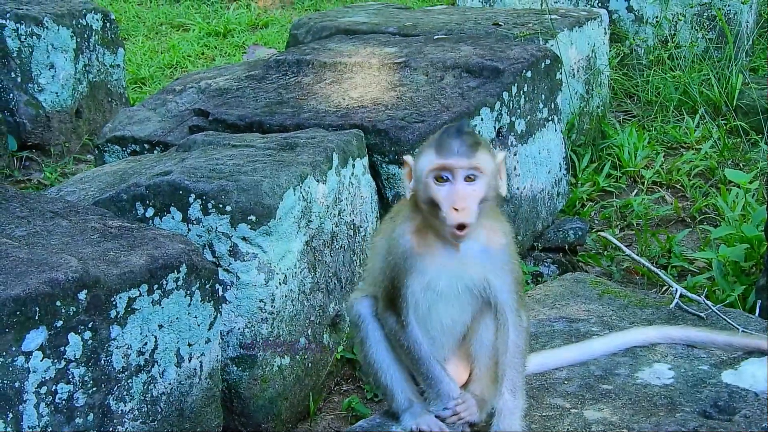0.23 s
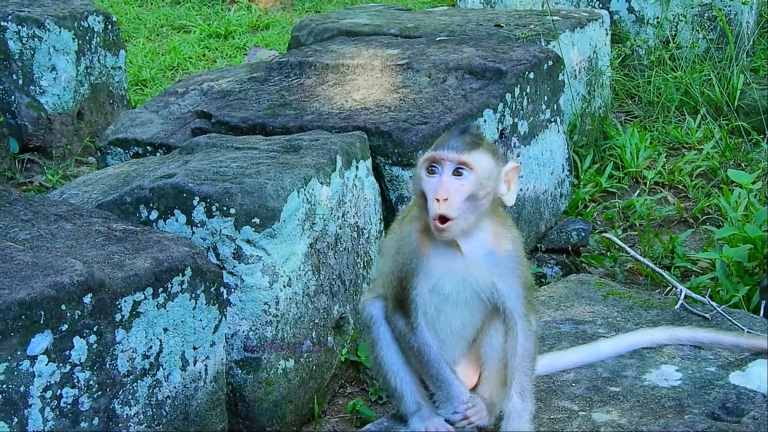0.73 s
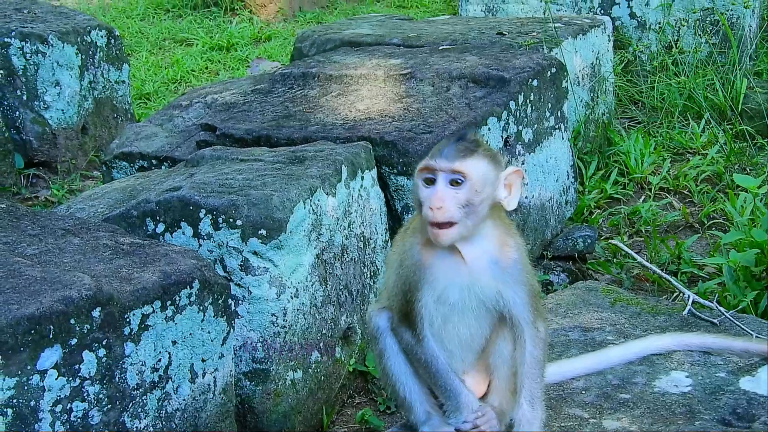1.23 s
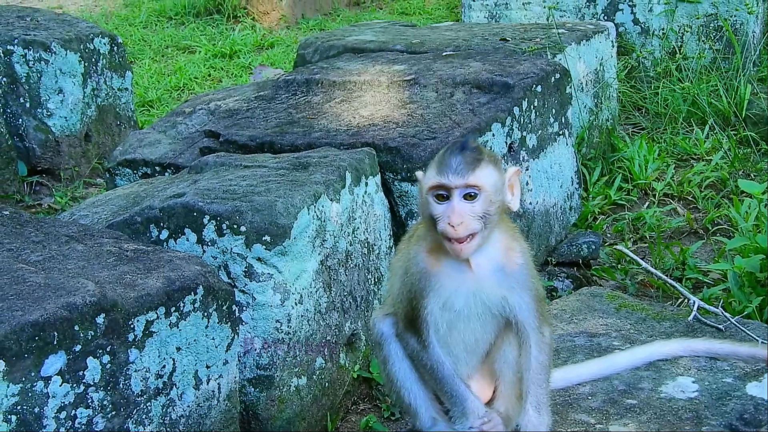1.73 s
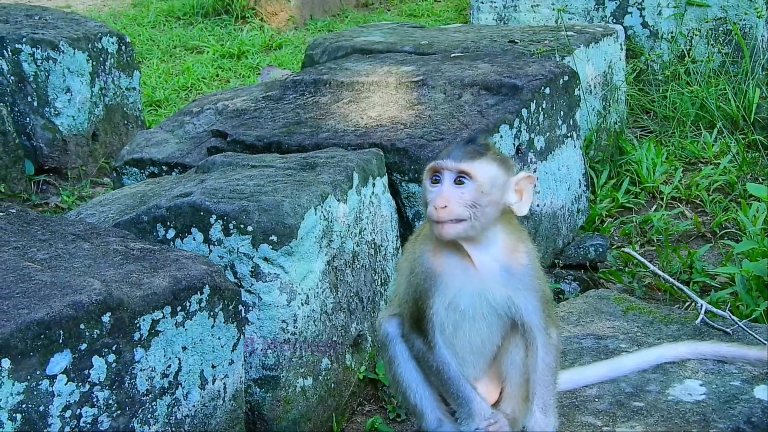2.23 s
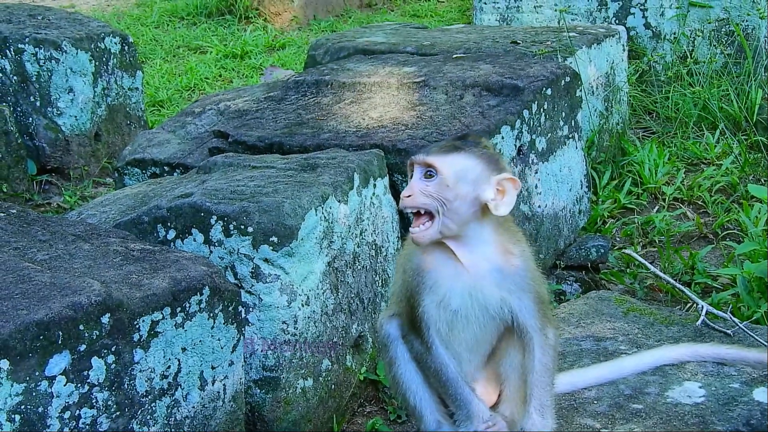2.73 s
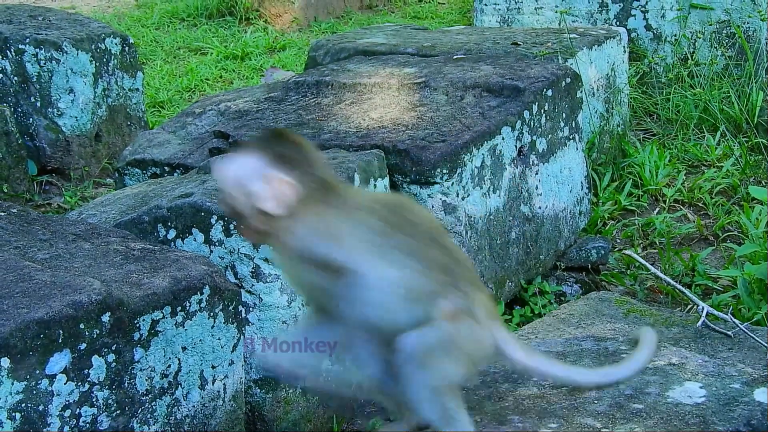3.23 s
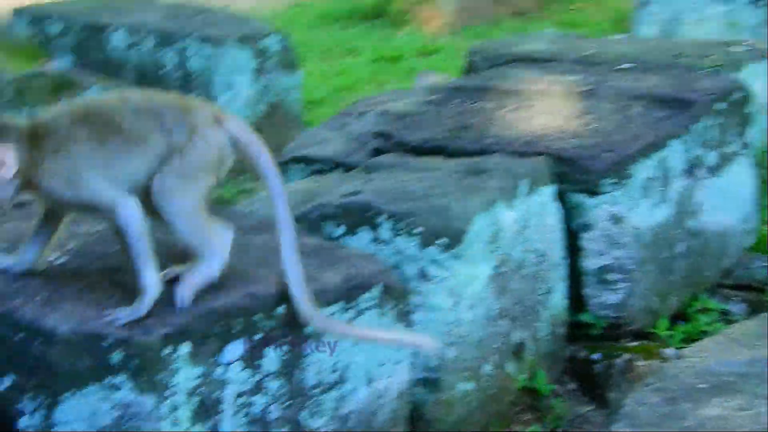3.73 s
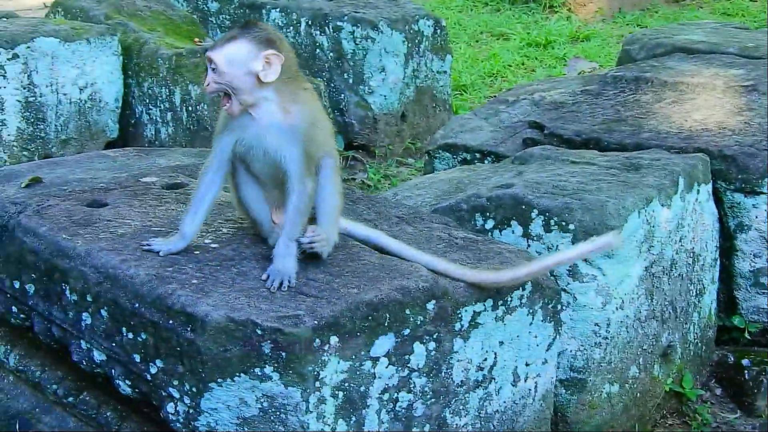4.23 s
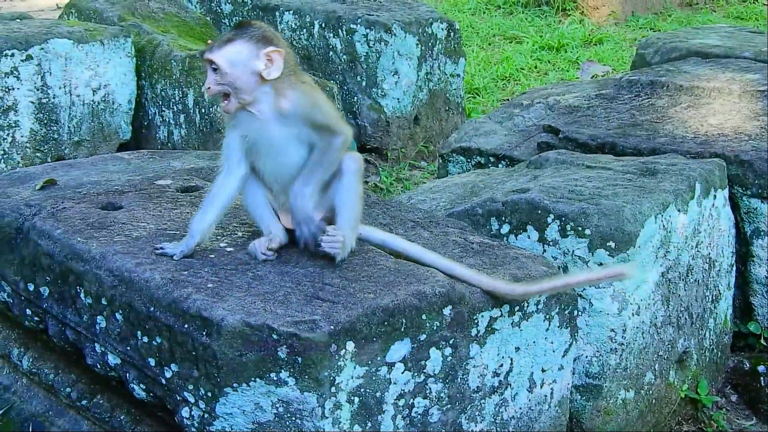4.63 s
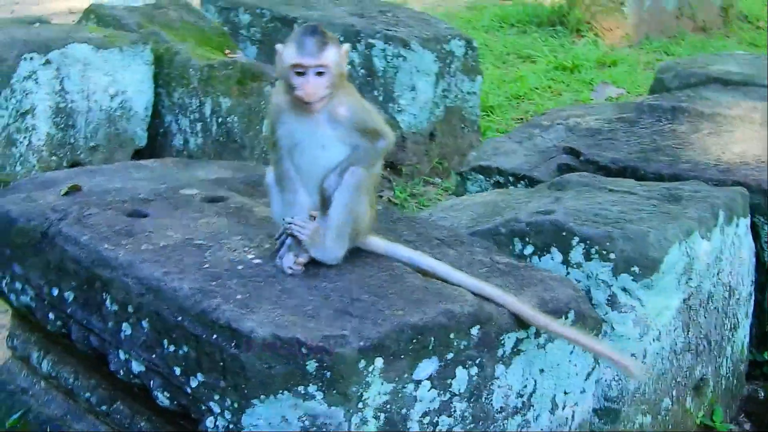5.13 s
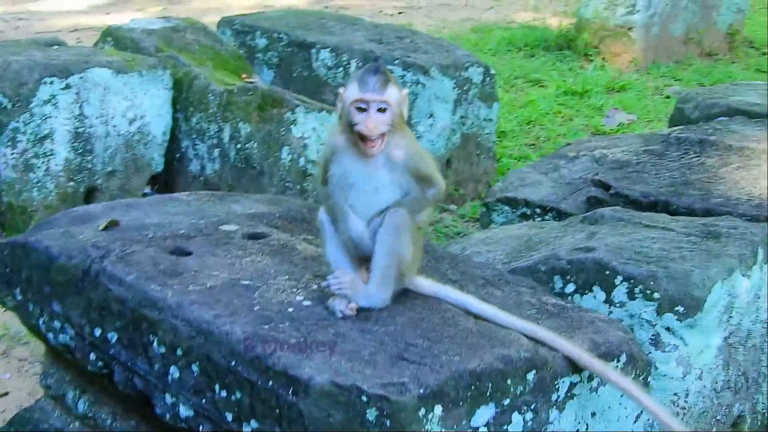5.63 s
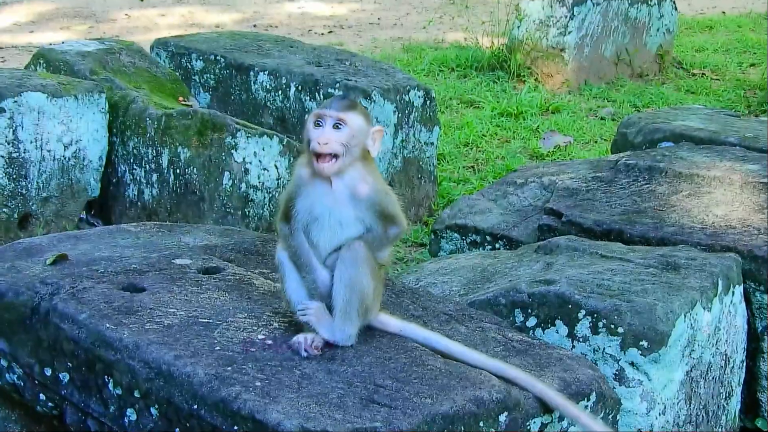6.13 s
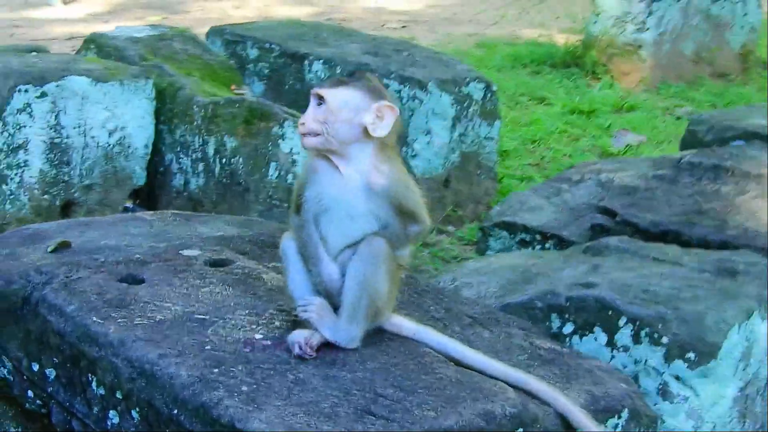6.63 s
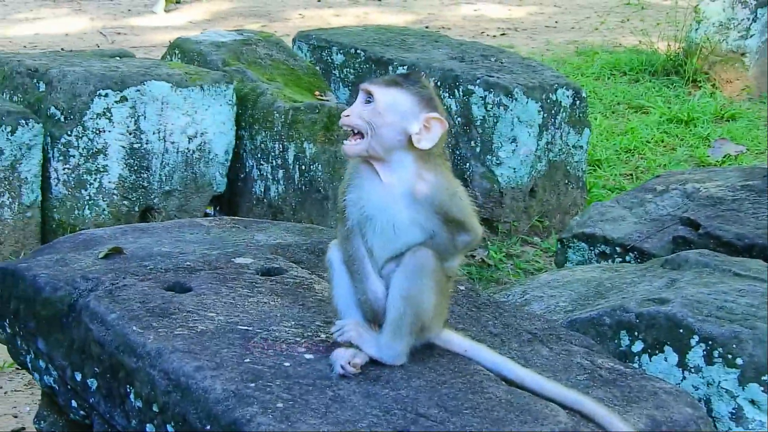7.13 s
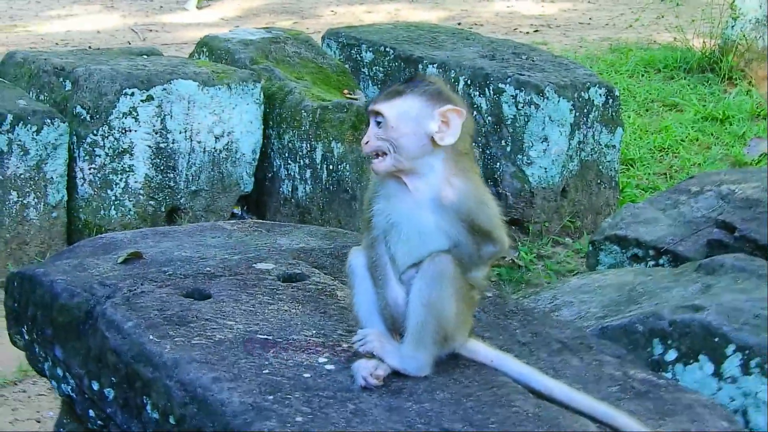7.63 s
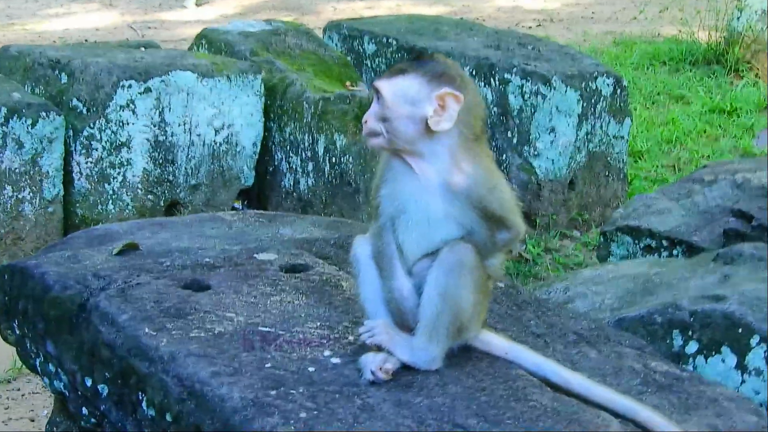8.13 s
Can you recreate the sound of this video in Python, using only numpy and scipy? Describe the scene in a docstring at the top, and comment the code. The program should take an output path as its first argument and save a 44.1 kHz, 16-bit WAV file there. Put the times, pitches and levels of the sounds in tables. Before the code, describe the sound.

Soft clear cooing from a small monkey stops early, followed by little peeps and a gap. Then come piercing squeals, whistling and torn with rasp: one long, one half as long, a brief one after a pause, and a fluttering cleaner one near the end. Behind runs a thin insect buzz, breathy foliage noise with occasional puffs, and low engine rumble. The voice is fairly near and central, with a quick stony scatter.

```python
"""Young monkey squealing on stone blocks

A young monkey outdoors ends a soft coo of clean partials, then squeals four times, with short whimpers between.
A squeal is a high whistle of the vocal folds, a second slower vibration that mixes with it,
and a rasp of torn tones and throat hiss when both turn irregular. Stone blocks and trees scatter the voice.
Around it insects sing as narrow bands, filtered noise hisses and rustles as leaves, and a far engine hums."""
import sys
import numpy as np
from scipy import signal
from scipy.io import wavfile
from scipy.ndimage import uniform_filter1d

SR = 44100
rng = np.random.default_rng(int(sys.argv[2]) if len(sys.argv) > 2 else 0)


def inscribe(sig):
    """Save sig as 16-bit PCM at rate SR to the path in sys.argv[1].

    A 1-D sig is mono; a 2-D sig holds one channel per row.
    Samples are clipped to [-1, 1] before scaling.
    """
    pcm = np.round(np.clip(np.atleast_2d(sig).T, -1, 1) * 32767)
    wavfile.write(sys.argv[1], SR, pcm.astype(np.int16))


N = 369538   # length in samples


def amp(db):
    """Turn dB into a linear gain."""
    return 10 ** (np.asarray(db) / 20)


def rms_one(x):
    """Scale a signal to an RMS of 1."""
    return x / np.sqrt(np.mean(x ** 2) + 1e-20)


def in_time(rows):
    """Draw straight lines through a table whose first column is seconds; one curve per further column."""
    s, *columns = np.transpose(rows)
    return [np.interp(np.arange(N) / SR, s, c) for c in columns]


def at_hz(points, hz):
    """Read a spectrum table at a frequency, on a logarithmic frequency axis."""
    table_hz, values = np.array(points).T
    return np.interp(np.log(hz), np.log(table_hz), values)


def smooth(x, seconds):
    """Round off a curve with a moving average."""
    return uniform_filter1d(x, max(int(seconds * SR), 1))


def drift(rate):
    """Slow chance: noise through a double one-pole low-pass at this rate in Hz; spread 1."""
    r = np.exp(-2 * np.pi * rate / SR)
    settled = signal.lfilter([1], [1, -2 * r, r * r], rng.standard_normal(N + SR))[SR:]
    return rms_one(settled)


def turns(hz):
    """Phase in radians of a tone with this pitch curve."""
    return 2 * np.pi * np.cumsum(hz) / SR


def resonate(x, hz, width_hz):
    """Ring a two-pole resonance."""
    r = np.exp(-np.pi * width_hz / SR)
    return signal.lfilter([1 - r, 0, r - 1], [1, -2 * r * np.cos(2 * np.pi * hz / SR), r * r], x)


def noise_band(x, hz, width_hz):
    """Pass noise through the same resonance twice, at an RMS of 1."""
    return rms_one(resonate(resonate(x, hz, width_hz), hz, width_hz))


def gate(start, end, fade):
    """Open from start to end with straight fades, all in seconds."""
    t = np.arange(N) / SR
    return np.clip(np.minimum(t - start, end - t) / fade, 0, 1)


def pan(x, db):
    """Place a mono sound by its left-over-right level in dB."""
    return np.array([x * amp(db / 2), x * amp(-db / 2)])


# The whistle of the vocal folds, one list per squeal.
# Each row: time in seconds, pitch in Hz, level in dB.
SQUEAL_WHISTLES = [
    [(2.563, 2815, -28), (2.585, 2960, -53.5), (2.62, 4350, -22.5), (2.65, 5010, -27), (2.68, 6250, -18),
     (2.72, 6790, -23), (2.76, 6060, -31), (2.83, 5600, -25), (2.865, 6520, -16.5), (2.9, 7000, -31),
     (2.995, 5446, -31), (3.02, 6950, -24.5), (3.045, 7400, -30), (3.1, 5780, -40), (3.15, 5256, -38),
     (3.25, 6890, -34.5), (3.3, 6790, -44), (3.45, 6280, -42), (3.55, 6980, -34.5), (3.61, 7030, -35),
     (3.675, 6970, -33), (3.7, 5947, -39), (3.722, 4095, -40)],
    [(3.959, 5420, -55.5), (3.975, 5530, -33.5), (3.99, 5730, -27.5), (4.02, 7420, -21.5),
     (4.07, 7870, -24), (4.11, 6990, -35), (4.15, 6980, -32.5), (4.18, 6335, -27), (4.2, 6780, -29.5),
     (4.22, 6030, -27), (4.255, 6750, -26), (4.32, 7190, -26), (4.37, 6980, -33), (4.41, 5910, -33),
     (4.451, 5650, -47.5)],
    [(5.548, 3686, -63), (5.58, 5120, -31.5), (5.6, 6300, -24.5), (5.63, 6830, -25), (5.67, 6280, -37),
     (5.71, 6580, -32), (5.745, 6365, -20.5), (5.78, 6296, -16.5), (5.828, 7140, -28), (5.848, 7300, -14.5),
     (5.877, 7165, -19.5), (5.89, 6690, -33), (5.91, 6200, -25.5), (5.93, 5810, -22), (5.95, 5795, -22.5),
     (5.968, 4340, -34.5)],
    [(6.994, 5330, -27.5), (7.018, 5257, -24.5), (7.035, 5690, -19.5), (7.052, 6380, -19),
     (7.085, 6530, -19), (7.12, 6035, -17.5), (7.152, 5885, -16.5), (7.176, 6114, -14.5),
     (7.2, 5640, -16.5), (7.22, 5150, -28), (7.242, 5060, -26.5), (7.264, 5770, -13.5),
     (7.287, 6290, -16.5), (7.322, 6510, -14.5), (7.347, 6370, -24.5), (7.362, 5850, -20.5),
     (7.4, 5300, -26.5), (7.43, 4790, -26.5), (7.452, 3640, -32)],
]
# Left-over-right level as the head turns. One value per squeal, in dB.
SQUEAL_SIDE_DB = [-0.32, 0.75, -0.82, 1.9]
PITCH_ROUNDING_S = 0.015


def squeals():
    """Two vibrations and their mixing tones; the louder the rasp against the whistle, the more both tear."""
    hz, db = in_time(np.concatenate(SQUEAL_WHISTLES))
    hz = smooth(hz, PITCH_ROUNDING_S)
    state = rasp_state()
    rasp_db = state[0]
    rough = np.clip((rasp_db - db + 14.0) / 15, 0, 1)
    drowned = np.clip((rasp_db - db + 8.5) / 14, 0, 1)     # the whistle gives way later than the mixing tones

    sum_db, second_hz, low_db, low_hz = state[1:]
    high = turns(hz * (1 + (.001 + .022 * drowned ** 2) * drift(200)))
    second = turns(second_hz * (1 + .05 * rough * drift(152.6)))
    steps = np.tanh(3 * drift(12))     # holds a pitch, then steps
    low = turns(low_hz * (1 + (0.00365 + 0.03 * rough) * drift(222) + .04 * rough * steps))

    tones = amp(db + 5 * drowned * drift(110) + 1.5 * drift(35)) * np.sin(high)
    tones += steady_mixing_tones(hz, db, rough, high)
    tones += overtones(hz, rough, high)
    low_flicker_db = rough * (3.5 * drift(120) + 4 * drift(15))     # breaks off and returns
    tones += amp(low_db + low_flicker_db) * np.sin(low)
    tones += amp(sum_db + 3.5 * rough * drift(60)) * np.sin(high + second)

    rasp = .8 * rms_one(torn_tones(high, second, low)) + .6 * rms_one(throat_hiss())
    voice = np.sqrt(2) * tones + amp(rasp_db) * rasp
    return sum(pan(voice * gate(rows[0][0], rows[-1][0], 0.0076), side_db)
               for rows, side_db in zip(SQUEAL_WHISTLES, SQUEAL_SIDE_DB))


# Bouts of rasp.
# Each row: start and end in seconds, rasp level first and last in dB, sum tone over rasp in dB,
# second vibration in Hz, low band level in dB, low band pitch first and last in Hz.
RASP_BOUTS = [(2.6, 2.634, -34, -32, -5, 3820, -70, 3500, 3500),
              (2.658, 2.718, -48, -39, 8, 3840, -50, 3170, 3050),
              (2.72, 2.832, -26, -22.5, -3, 2540, -47, 3300, 3500),
              (2.833, 2.867, -43.5, -38, -10, 2622, -48, 3300, 3200),
              (2.868, 2.963, -22.5, -28, -2, 2860, -46, 2970, 3700),
              (2.965, 3.017, -19, -19.5, -11, 3000, -30, 3775, 3780),
              (3.015, 3.079, -29, -37, 2, 3876, -34.5, 3750, 3604),
              (3.08, 3.261, -26.5, -27.5, -4, 3227, -42, 3650, 4000),
              (3.26, 3.396, -31, -29.5, -5, 2902, -40, 3856, 3693),
              (3.395, 3.549, -31, -28.5, -1.5, 2880, -42.5, 3620, 4000),
              (3.55, 3.739, -30, -32.5, -11, 3030, -39, 4000, 3600),
              (3.951, 3.969, -56.5, -53.5, -25, 3800, -29.5, 3955, 3950),
              (3.968, 4.027, -19.5, -22, -10, 3820, -29, 3905, 3754),
              (4.025, 4.119, -34.5, -36.5, -1, 3720, -30.5, 3790, 3566),
              (4.12, 4.191, -34.5, -27, 5, 3206, -41.5, 3460, 3253),
              (4.191, 4.21, -38, -25, 3.5, 3290, -35, 3273, 3298),
              (4.21, 4.336, -21, -33, -1.5, 2850, -44.5, 3060, 3400),
              (4.33, 4.415, -28, -25, -3, 2746, -41, 3400, 4000),
              (4.41, 4.438, -29.5, -18, -27, 3020, -28, 4320, 1993),
              (5.546, 5.631, -30.5, -23, -2.5, 3140, -47, 2600, 3450),
              (5.63, 5.762, -30, -23, -2, 2300, -40.5, 3500, 4070),
              (5.76, 5.782, -41.5, -33, 11.5, 3040, -56, 4000, 4000),
              (5.881, 5.941, -27.5, -25, 2, 2410, -41.5, 3900, 4020),
              (7.1, 7.155, -46.5, -52, 6, 3050, -57, 3750, 3690),
              (7.353, 7.419, -27.5, -28.5, 1, 2940, -39, 3750, 3470),
              (7.433, 7.448, -36, -18, -26, 2900, -38, 2900, 2120)]
CALM_RASP_DB, CALM_TONES_DB = -53.5, -72     # between bouts
LOCKED_HZ = 3900     # the second vibration when it is steady
SWITCH_S = 0.0098    # time to change state


def rasp_state():
    """Rasp dB, sum tone dB, second vibration Hz, low band dB and Hz: calm, except during a bout."""
    calm = [CALM_RASP_DB, CALM_TONES_DB, LOCKED_HZ, CALM_TONES_DB, LOCKED_HZ]
    state = np.outer(calm, np.ones(N))
    for start, end, first_db, last_db, sum_db, second_hz, low_db, first_hz, last_hz in RASP_BOUTS:
        a, b = int(start * SR), int(end * SR)
        first = [first_db, first_db + sum_db, second_hz, low_db, first_hz]
        last = [last_db, last_db + sum_db, second_hz, low_db, last_hz]
        state[:, a:b] = np.linspace(first, last, b - a).T
    return smooth(state, SWITCH_S)


def steady_mixing_tones(hz, db, rough, high):
    """Difference and sum of the whistle and the locked vibration; both fade as the difference sinks."""
    locked = turns(np.full(N, LOCKED_HZ))
    under = np.clip((hz - LOCKED_HZ) / 1000 - 1.3, 0, 1) * (1 - rough)
    difference = amp(db - 32 + 3.3 * drift(38)) * np.sin(high - locked)
    return under * (difference + amp(db - 38) * np.sin(high + locked))


# The octave is strong at low pitch and sinks above the knee and in rasp.
OCTAVE_DB, OCTAVE_FLOOR_DB, OCTAVE_TORN_DB = -31.5, -44, -15
OCTAVE_KNEE_HZ, OCTAVE_DB_PER_KHZ = 5150, -15.5


def overtones(hz, rough, high):
    """Second and third harmonics of the whistle, shaped by the throat."""
    above_knee_db = OCTAVE_DB_PER_KHZ * (hz - OCTAVE_KNEE_HZ) / 1000
    octave_db = np.minimum(OCTAVE_DB + above_knee_db, OCTAVE_DB) + OCTAVE_TORN_DB * rough
    octave_db = np.maximum(octave_db, OCTAVE_FLOOR_DB - 23.0 * np.minimum(3.3 * rough, 1))
    octave_db -= 6.1 * np.clip((4600 - hz) / 1000, 0, 3)     # and below the throat's upper resonance
    octave = amp(octave_db + rough * (6.8 * drift(70) + 8.5)) * np.sin(2 * high)
    third_db = octave_db + 7.5 - 80 * np.log2(3 * hz / 10000) ** 2     # lifted near the upper resonance
    rising_and_low = (np.gradient(hz) > 0) * (hz < 4500)
    return octave + amp(third_db) * np.sin(3 * high) * rising_and_low


SIDE_BRANCH_HZ = 646     # a torn branch this far above the low band


def torn_tones(high, second, low):
    """The irregular vibration jumps about, leaving scraps of the mixing tones."""
    leaps = turns(600 * np.tanh(3 * drift(25)))
    branch = low + turns(np.full(N, SIDE_BRANCH_HZ))
    torn = drift(160) * np.sin(high + second + leaps)
    torn += 1.82 * drift(114) * np.sin(high + second - 1.4 * leaps)
    torn += .4 * drift(150) * np.sin(high - 1.3 * leaps)
    torn += .25 * drift(120) * np.sin(low + leaps)
    torn += .16 * drift(80) * np.sin(second - .4 * leaps)
    torn += 0.088 * drift(90) * np.sin(high - low + .3 * leaps)
    torn += 0.47 * drift(70) * np.sin(branch + .3 * leaps)
    return torn


# Throat resonances that colour the hiss.
# Each row: centre in Hz, width in Hz, level in dB against the other bands.
THROAT_BANDS = [(2300, 4000, -12), (4000, 3300, -3.5), (6200, 5900, 2), (8140, 5340, 7), (9930, 5400, 1.5),
                (12000, 3900, -34)]
CLUMP_DB = 2.5     # each band swells and fades on its own


def throat_hiss():
    """Uneven bursts of air through the throat's resonances, with alternating sign."""
    flutter = rng.standard_normal(N) * amp(2.0 * drift(140))
    return sum(amp(band_db + CLUMP_DB * drift(17)) * (-1) ** k * noise_band(flutter, hz, width_hz)
               for k, (hz, width_hz, band_db) in enumerate(THROAT_BANDS))


# The pitch and swell of the coo.
# Each row: time in seconds, pitch in Hz, level in dB.
COO_LINE = [(0, 747, -41.5), (0.242, 772, -39), (0.33, 783, -35.5), (0.42, 789, -33), (0.53, 771, -37),
            (0.548, 791, -38), (0.581, 796.6, -34.5), (0.66, 807, -33), (0.731, 804, -34), (0.76, 771, -45),
            (0.786, 701.2, -56)]
# The coo's partials, before the lips shape them.
# Each row: multiple of the pitch, level in dB against the coo's level.
COO_PARTIALS = [(1, 1.5), (2, -5), (3, -17.5), (4, -20.5), (5, -18.5), (6, -21), (7, -19.5), (8, -27),
                (9, -17), (10, -11.5), (11, -6), (12, -13), (13, -29), (14, -26), (15, -51), (16, -43)]
LIPS_PART_S, LIPS_PART_TAKES_S = 0.53, .025
CLOSED_DB, PARTED_DB = -6.5, 5.5     # added to the second partial before and after the lips part
# Upper partials come in slowly and follow only a share of the swell.
UPPER_RISE_S, UPPER_START_DB, UPPER_FOLLOWS = 0.18, -6.5, 0.1


def coo():
    """Clean partials of one wavering pitch; the second follows the opening of the lips."""
    hz, db = in_time(COO_LINE)
    parted = gate(LIPS_PART_S - LIPS_PART_TAKES_S / 2, N / SR, LIPS_PART_TAKES_S)
    second_db = CLOSED_DB + (PARTED_DB - CLOSED_DB) * parted
    upper_db = UPPER_START_DB * (1 - gate(0, N / SR, UPPER_RISE_S))
    upper_db -= (1 - UPPER_FOLLOWS) * np.maximum(db + 35.5, -2.0)
    phase = turns(hz * (1 + 0.0037 * drift(67)))
    tone = np.zeros(N)
    for k, level_db in COO_PARTIALS:
        if k == 2:
            level_db = level_db + second_db
        elif k > 2:
            level_db = level_db + upper_db + 3.0 * drift(4)
        tone += amp(level_db) * np.sin(k * phase)
    ending = gate(-1, COO_LINE[-1][0], 0.025)     # already sounding at the start
    return pan(np.sqrt(2) * amp(db) * tone * ending, -3.5)


# Short whimpers.
# Each row: start in seconds, length in seconds, first, middle and last pitch in Hz,
# peak level of the lowest partial in dB, fall per partial in dB.
WHIMPER_NOTES = [(1.465, 0.057, 760, 880, 1070, -46, 14), (1.521, 0.027, 1020, 920, 890, -36.5, 11),
                 (1.705, 0.045, 780, 910, 796, -51.5, 16), (4.65, 0.059, 840, 922, 880, -49, 95),
                 (6.799, 0.048, 1550, 1373, 1720, -42, 7), (6.839, 0.07, 1900, 2820, 3850, -46, 23),
                 (6.808, 0.021, 4700, 4350, 4340, -38, 30), (6.828, 0.055, 4550, 5140, 6270, -41.5, 19),
                 (6.972, 0.015, 9050, 9330, 10000, -46, 44)]


def whimpers():
    """Short gliding notes of three partials with a shared waver and flicker."""
    out, t = np.zeros(N), np.arange(N) / SR
    waver, flicker_db = 1 + .02 * drift(100), 4 * drift(60)
    for start, length, *hz, db, fall_db in WHIMPER_NOTES:
        glide_hz = np.interp(t, np.linspace(start, start + length, 3), hz)
        phase = turns(glide_hz * waver)
        tone = sum(amp(db - fall_db * k + flicker_db) * np.sin((k + 1) * phase) for k in range(3))
        out += tone * gate(start, start + length, length / 4)
    return out


SCATTER_DB, SCATTER_T60_S = -8, .11     # echo energy against the direct sound; time to fall 60 dB


def stones(x):
    """A dying scatter of echoes from blocks and trees, its own on each side."""
    t = np.arange(SR // 4) / SR
    echo = rng.standard_normal((2, len(t))) * amp(-60 * t / SCATTER_T60_S) * (t > .0015)
    echo *= amp(SCATTER_DB) / np.linalg.norm(echo, axis=1, keepdims=True)
    echo[:, 0] = 1     # direct sound
    return signal.fftconvolve(x, echo, axes=1)[:, :N]


# Puffs and rustles.
# Each row: start in seconds, length in seconds, centre in Hz, width in Hz, level in dB.
RUSTLE_BURSTS = [(0.494, 0.24, 1340, 894, -48), (1.512, 0.031, 9200, 1500, -48.5),
                 (4.9, 0.022, 4000, 4000, -45), (5.391, 0.32, 1574, 1428, -50.5),
                 (5.81, 0.2, 1389, 1146, -39), (5.967, 0.063, 8400, 2520, -35.5),
                 (5.955, 0.17, 3830, 300, -48), (6.406, 0.14, 1070, 990, -50),
                 (6.57, 0.032, 9360, 2500, -43.5), (7.444, 0.1, 8630, 1590, -40),
                 (7.445, 0.11, 5100, 1495, -41), (7.797, 0.089, 800, 492, -51),
                 (8.05, .13, 1200, 1550, -46.5)]


def rustles():
    """Bursts of grainy noise, each in one band, partly shared by left and right."""
    grain = rng.standard_normal((2, N)) * amp(3.0 * drift(60))
    grain[1] = 0.8 * grain[0] + 0.5 * grain[1]
    return sum(amp(db) * gate(start, start + length, length / 4) * noise_band(grain, hz, width_hz)
               for start, length, hz, width_hz, db in RUSTLE_BURSTS)


# The insect chorus over time.
# Each row: time in seconds, main pitch in Hz, main level in dB, lower band level in dB.
INSECT_CHORUS = [(0, 7020, -47, -79), (2.5, 7120, -46, -51.5), (4.6, 7090, -46, -51),
                 (5.5, 7170, -47.5, -52.5), (6.5, 7120, -47, -50.5), (8.38, 7150, -45, -50)]
# Fainter insect bands to either side of the main one.
# Each row: centre in Hz, width in Hz, level in dB.
SIDE_INSECT_BANDS = [(5260, 300, -54), (7600, 60, -65), (8540, 110, -59)]


def insects():
    """Singers near one pitch blur to narrow throbbing bands, unlike on the two sides."""
    hz, db, lower_db = in_time(INSECT_CHORUS)
    singers = [np.sin(turns(hz + off_hz + 14 * drift(30))) * amp(3 * drift(10) + 2.5 * drift(60))
               for off_hz in (-55, 5, 70, 40)]
    left = singers[0] + .6 * singers[1] + .6 * singers[2]
    right = singers[0] + .6 * singers[3] + .6 * singers[2]
    out = amp(db) * rms_one(np.array([left, right]))
    white = rng.standard_normal((2, N))
    out += amp(lower_db) * noise_band(white, 6485, 140)
    for band_hz, width_hz, band_db in SIDE_INSECT_BANDS:
        out += amp(band_db + 0.5 * drift(6.0)) * noise_band(white, band_hz, width_hz)
    return out


# The spectrum of the air, before its overall level is set.
# Each row: frequency in Hz, relative density in dB per Hz.
AIR_SPECTRUM = [(30, -22), (50, -6.5), (100, 2.5), (200, -12.5), (300, -20), (700, -22.5), (2000, -24.5),
                (4000, -24.5), (5500, -22), (7000, -20.5), (8500, -30.5), (11000, -33), (12500, -56)]
# The swell of the leaves' hiss.
# Each row: time in seconds, added level in dB.
LEAF_SWELL = [(0, -2), (1.4, 0), (1.9, -3.5), (2.1, 0.5), (2.8, -1.5), (3.7, -4), (5.3, -4.5), (5.6, 1),
              (6.15, 1), (6.4, 1.5), (7.0, 4.5), (8.38, -2)]
# How alike left and right are; values below 0 act as 0.
# Each row: frequency in Hz, likeness (1 is the same on both sides).
SIDE_LIKENESS = [(60, 1.5), (150, 0.77), (380, 0.46), (950, 0.73), (2380, 0.55), (5980, 0.44), (15000, -29)]
AIR_DB = -42     # rumble and leaves together


def air():
    """Half-octave bands of stereo noise: steady rumble below, leaves that swell from 600 to 5000 Hz."""
    out, edges = 0, 25 * 2 ** np.arange(0, 9.6, .5)
    white, swell_db = rng.standard_normal((2, 2, N)), in_time(LEAF_SWELL)[0]
    for k, (low, high) in enumerate(zip(edges, edges[1:])):
        band = signal.butter(2, [low, high], "band", fs=SR, output="sos")
        mid, side = signal.sosfilt(band, white[k % 2])     # neighbouring bands use separate noise
        hz = np.sqrt(low * high)
        alike = np.clip(at_hz(SIDE_LIKENESS, hz), 0, 1)
        gain = amp(at_hz(AIR_SPECTRUM, hz) + swell_db * (600 < hz < 5000) + 1.3 * drift(5))
        stereo = np.sqrt(1 + alike) * mid + np.sqrt(1 - alike) * side * [[1], [-1]]
        out = out + gain * stereo
    return amp(AIR_DB) * rms_one(out)


# Two orders of the far engine.
# Each row: pitch in Hz, level in dB.
ENGINE_ORDERS = [(51.5, -43), (103, -49)]


def hum():
    """A far engine: two orders that waver together in pitch."""
    waver = 1 + 0.0289 * drift(1.547)
    orders = sum(np.sqrt(2) * amp(db + 0.3 * drift(11.0)) * np.sin(turns(hz * waver))
                 for hz, db in ENGINE_ORDERS)
    return pan(orders, -2.5)


def scene():
    """The voice among the stones, over a background with little top and the engine hum."""
    voice = stones(squeals() + coo() + whimpers())
    dull = signal.butter(10, 11500, fs=SR, output="sos")
    background = signal.sosfilt(dull, rustles() + insects() + air())
    return voice + background + hum()


CUTOFF_HZ = 15730


def record(dry):
    """A steep low-pass cuts the top."""
    return signal.sosfilt(signal.ellip(10, .5, 70, CUTOFF_HZ, fs=SR, output="sos"), dry)


dry = scene()
out = record(dry)
inscribe(out)
```